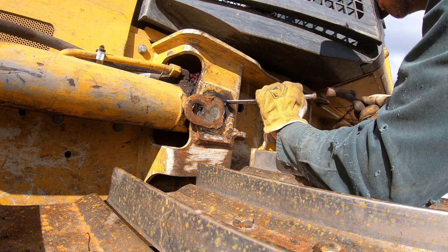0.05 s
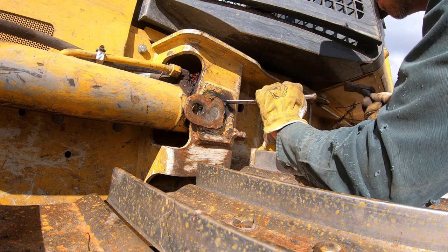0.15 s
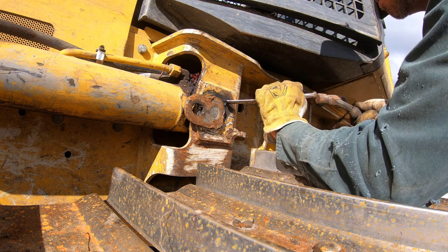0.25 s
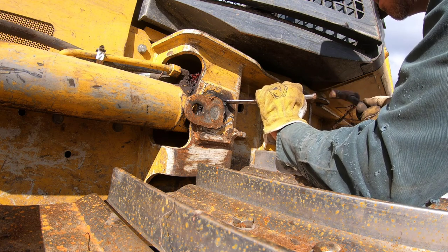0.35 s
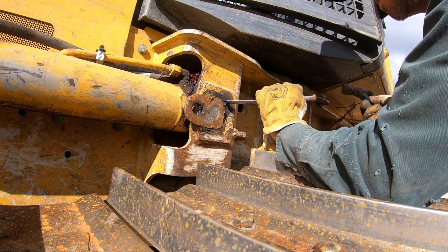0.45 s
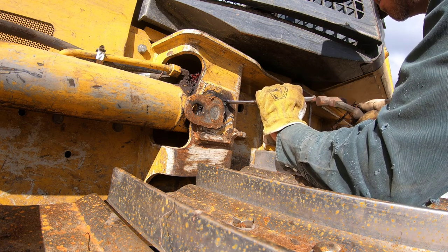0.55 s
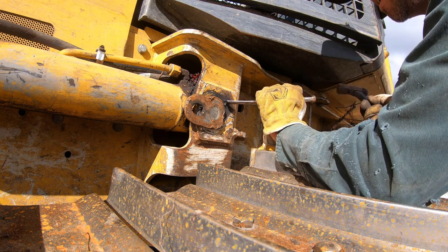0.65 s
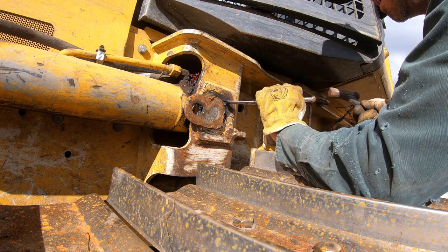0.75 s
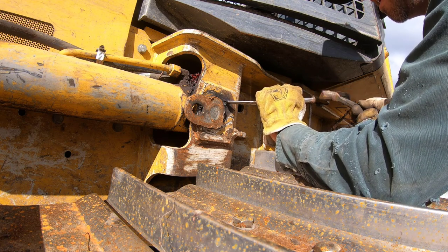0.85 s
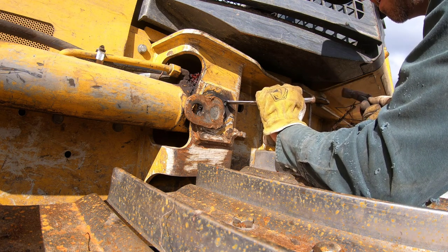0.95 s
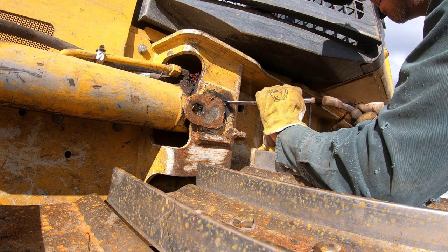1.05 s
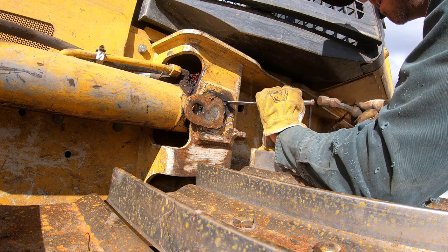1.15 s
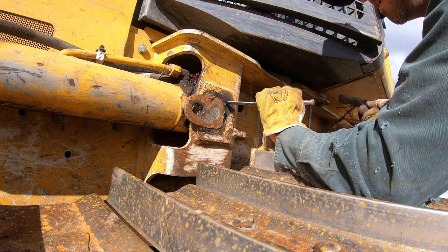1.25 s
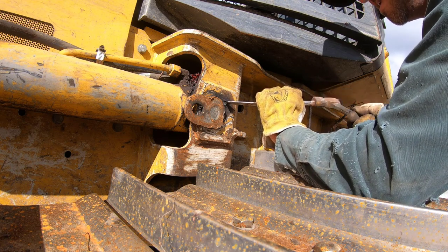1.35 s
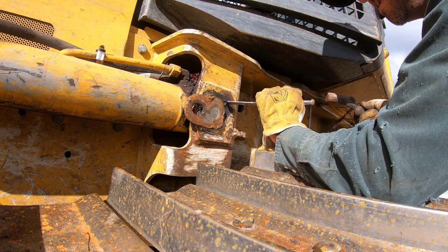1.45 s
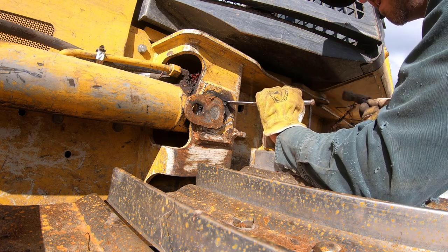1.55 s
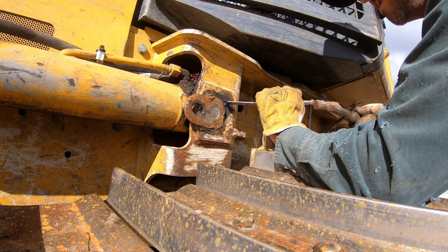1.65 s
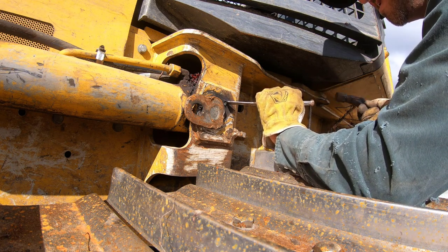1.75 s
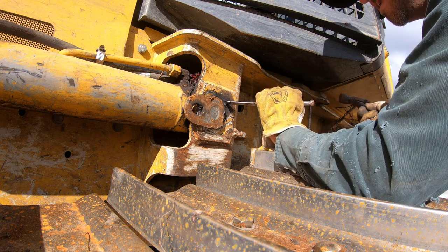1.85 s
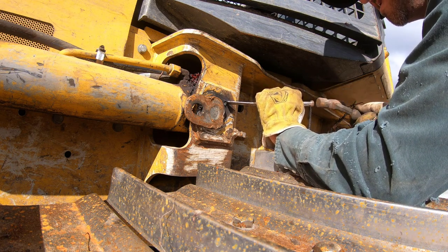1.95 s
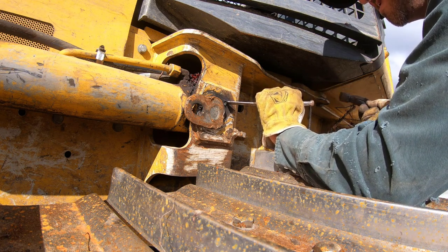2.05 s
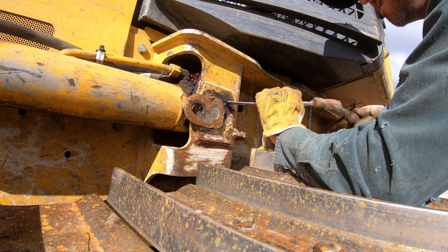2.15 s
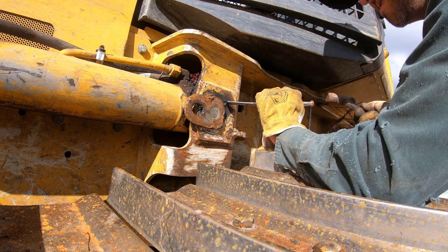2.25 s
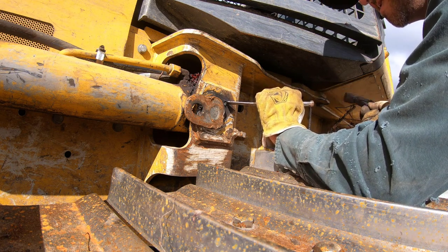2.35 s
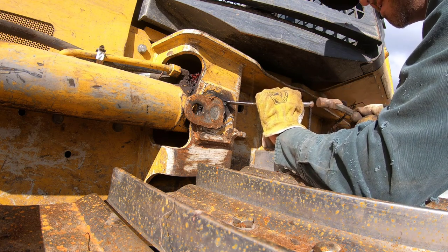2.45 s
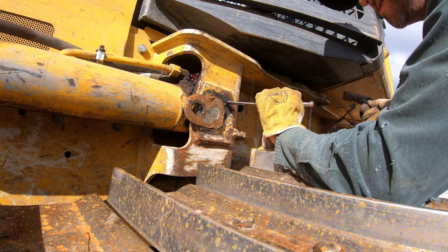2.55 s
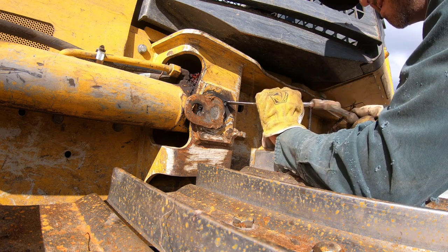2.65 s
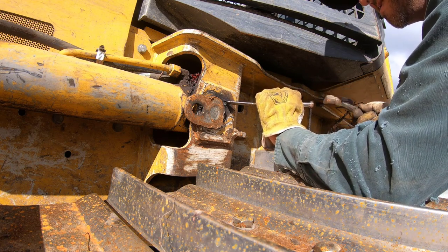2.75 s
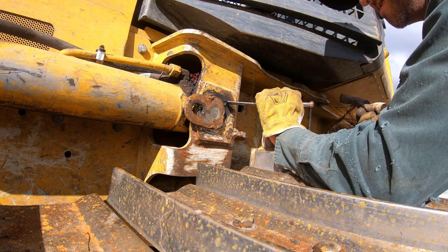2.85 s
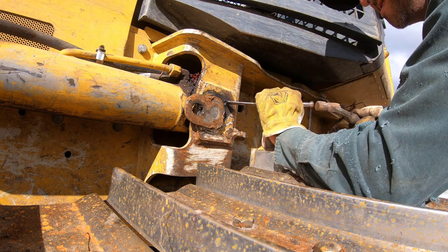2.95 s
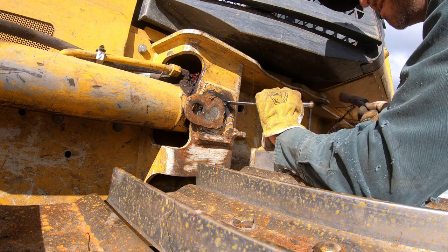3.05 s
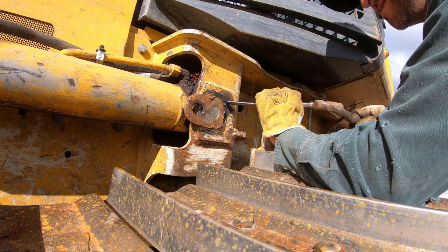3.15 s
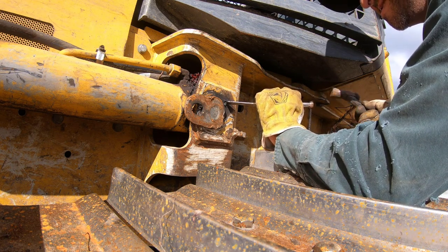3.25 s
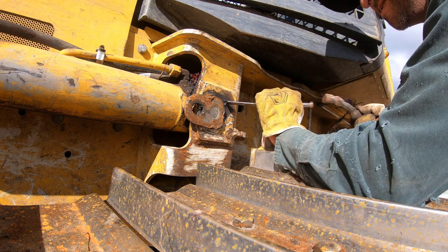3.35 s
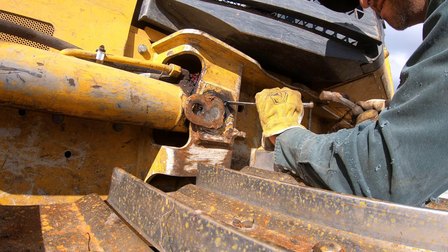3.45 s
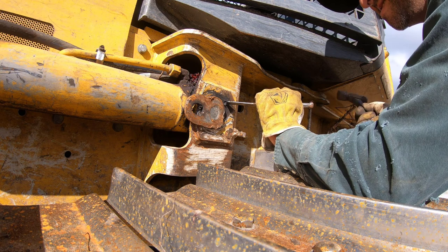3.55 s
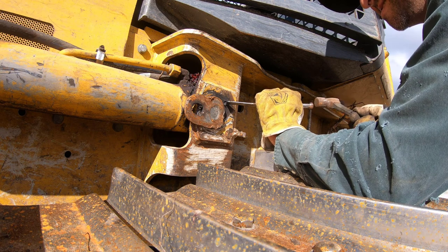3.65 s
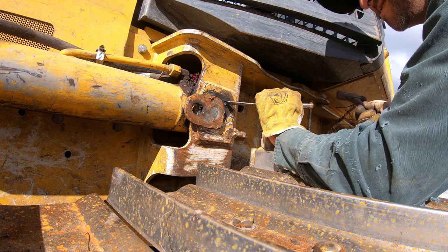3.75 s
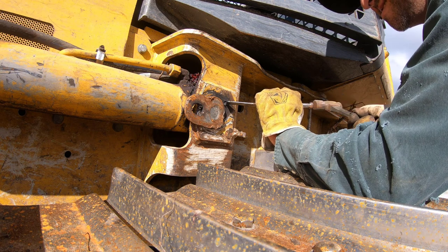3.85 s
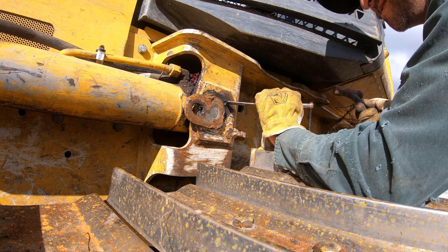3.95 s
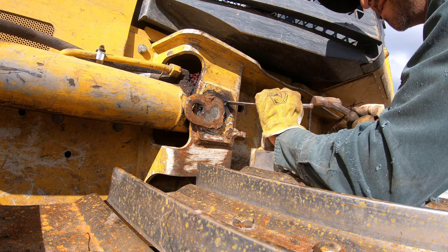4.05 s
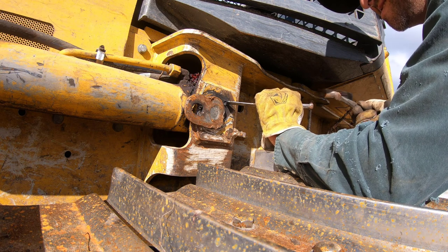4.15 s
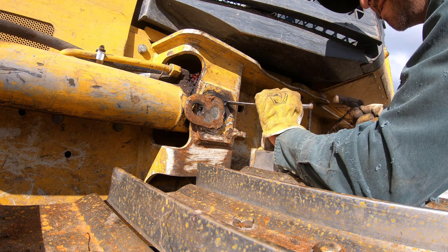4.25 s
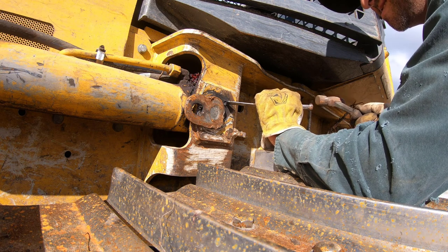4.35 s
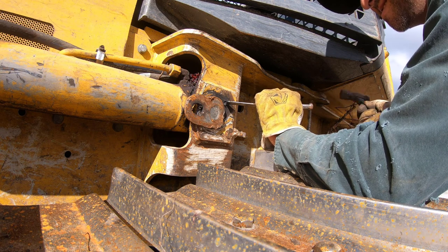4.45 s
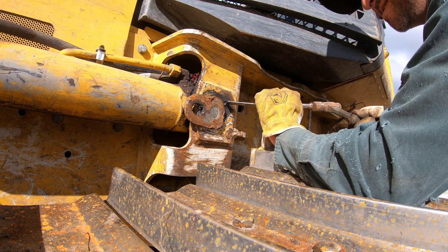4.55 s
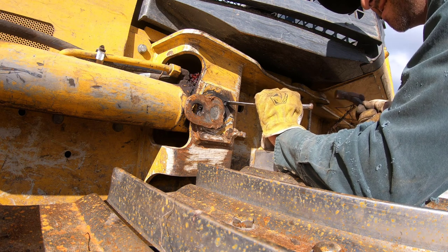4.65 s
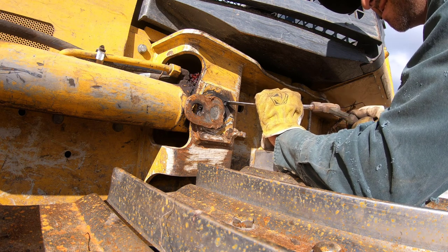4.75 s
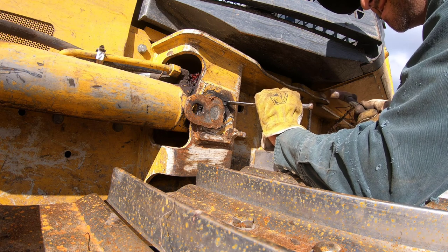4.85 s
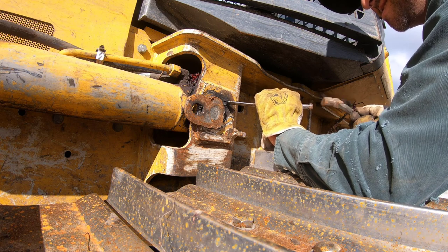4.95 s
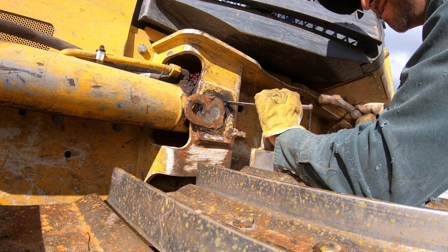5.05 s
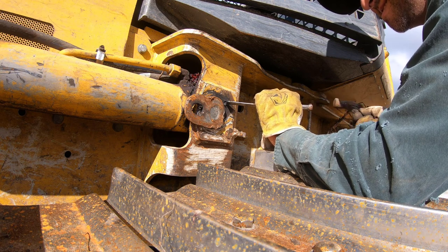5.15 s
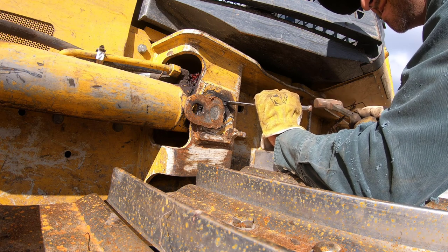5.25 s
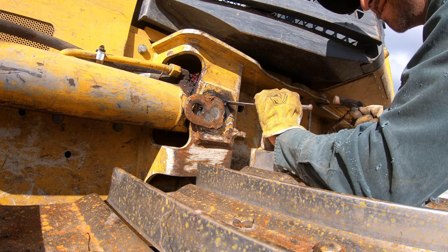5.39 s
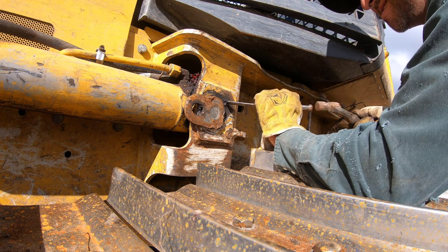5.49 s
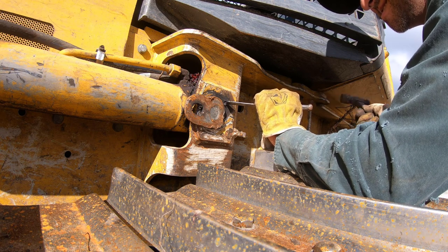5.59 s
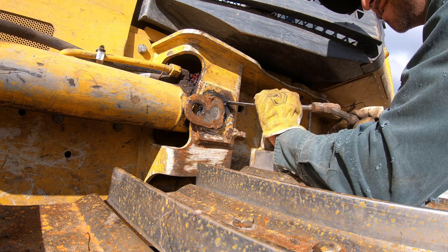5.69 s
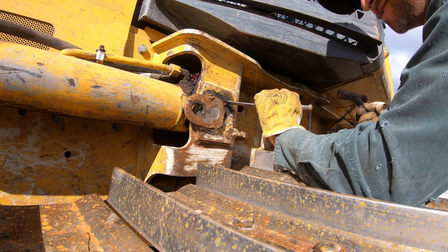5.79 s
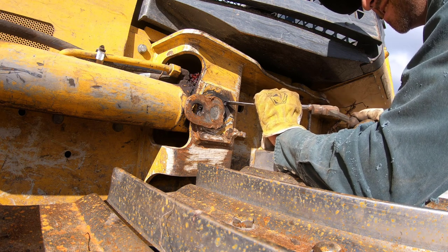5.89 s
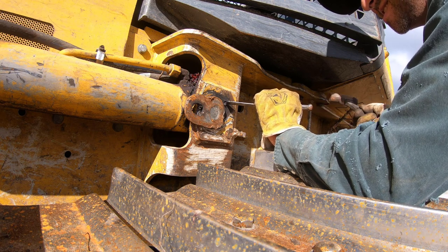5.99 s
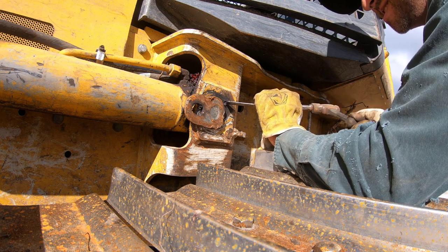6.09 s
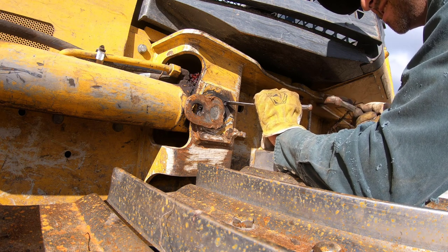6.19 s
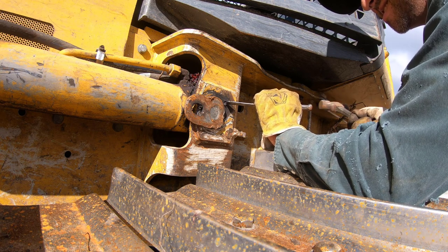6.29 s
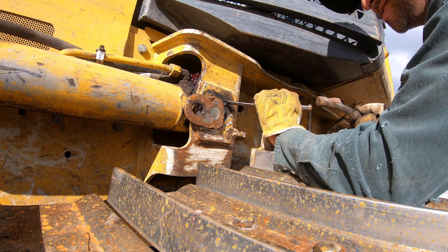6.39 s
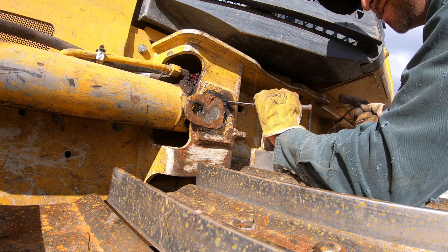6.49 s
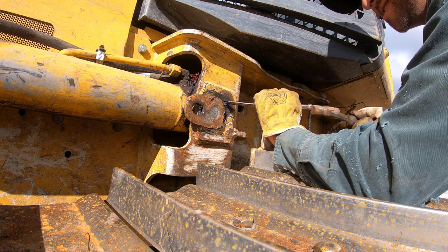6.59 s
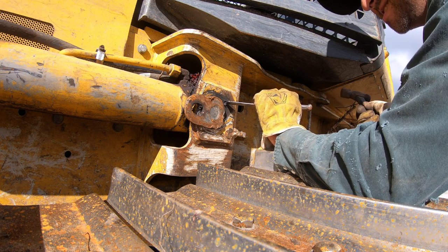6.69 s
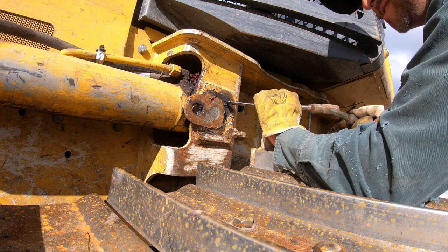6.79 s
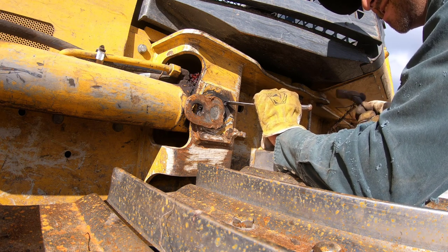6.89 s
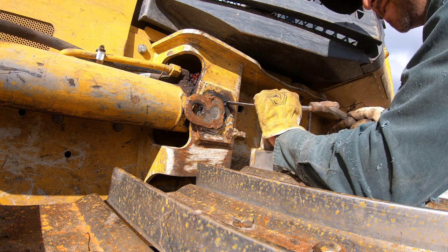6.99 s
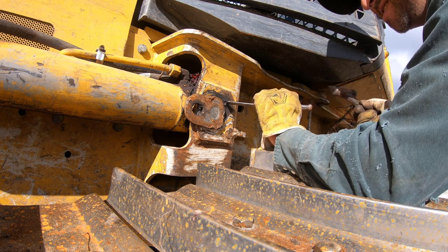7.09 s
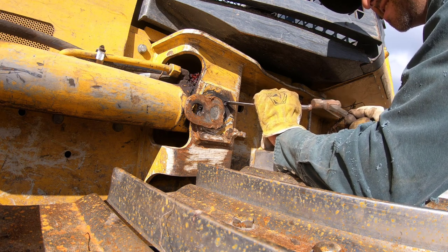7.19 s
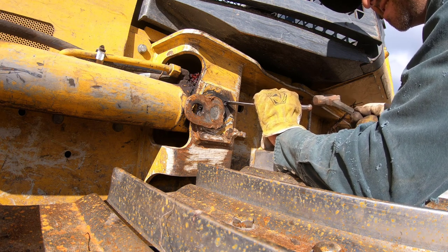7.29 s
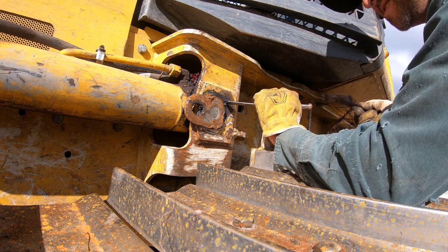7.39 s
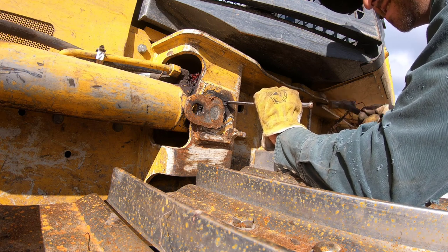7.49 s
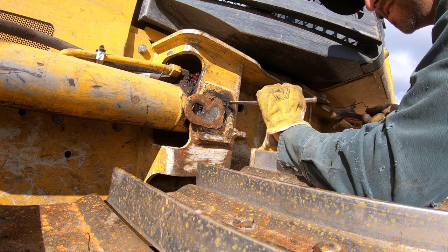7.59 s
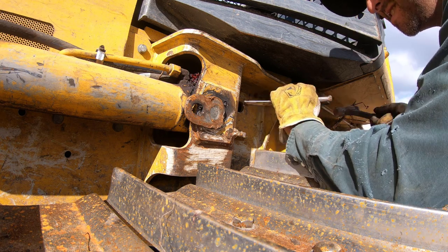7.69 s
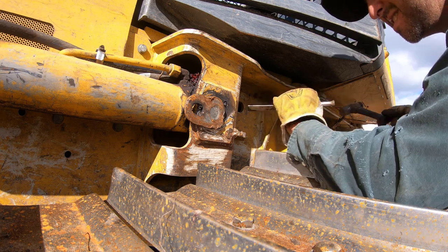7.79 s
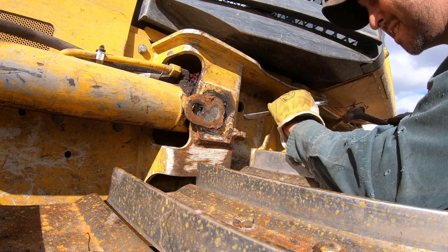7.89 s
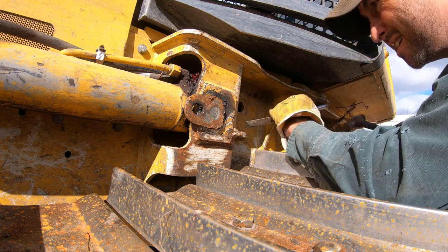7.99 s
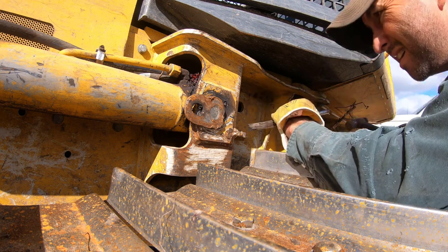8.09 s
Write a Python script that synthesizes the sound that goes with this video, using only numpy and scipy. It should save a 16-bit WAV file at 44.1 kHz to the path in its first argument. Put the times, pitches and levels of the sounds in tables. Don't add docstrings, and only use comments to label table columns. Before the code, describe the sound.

Close stereo pickup outdoors: a hammer strikes a steel chisel against a bolt on heavy machinery. Near-identical hard clanks come evenly, slightly under four per second, then a little faster, each with a sharp crack, short metallic ring and humming plates over a low sway. After the last blow around 7.3 seconds the ring dies, leaving faint hiss, glove rustle and tiny ticks.

```python
import sys
import numpy as np
from scipy import signal
from scipy.fft import rfft, irfft
from scipy.io import wavfile

SR = 44100
rng = np.random.default_rng(int(sys.argv[2]) if len(sys.argv) > 2 else 0)


def decibels_to_gain(level_db):
    exponent = np.asarray(level_db, float) / 20
    return 10 ** exponent


def transcribe(signal):
    frames = np.atleast_2d(signal).T
    limited = np.clip(frames, -1, 1)
    pcm = np.round(limited * 32767).astype(np.int16)
    wavfile.write(sys.argv[1], SR, pcm)


N = 358533
RESPONSE_N = SR

# t/s, sharpness/dB, sway/dB
FINDING_BLOWS = [(0.0519, -18, -30.5), (0.3359, -18.5, -33.5), (0.6163, -17, -36), (0.8823, -18.5, -30.5),
                 (1.1759, -18.5, -37), (1.457, -17.5, -32), (1.7332, -18, -32.5), (2.0003, -18, -30),
                 (2.2609, -19, -30.5), (2.5162, -18.5, -30.5), (2.7621, -20, -25.5)]
# t/s, sharpness/dB, sway/dB
STEADY_BLOWS = [(3.0136, -19.5, -24.5), (3.2426, -19.5, -28), (3.477, -19, -27), (3.7086, -19, -25),
                (3.9318, -19.5, -23.5), (4.1652, -19.5, -22.5), (4.3968, -18.5, -25.5), (4.6284, -18, -28),
                (4.8551, -19, -26.5), (5.079, -18.5, -25), (5.3013, -19, -26), (5.53, -18.5, -23.5),
                (5.7494, -19, -22.4), (5.964, -17.5, -24), (6.1885, -18.5, -29), (6.413, -18.5, -27.5),
                (6.6445, -18.5, -24.5), (6.8663, -18.5, -23.5), (7.086, -18, -19), (7.3036, -19, -20.5)]
BLOW_S, SHARP_DB, SWAY_DB = np.transpose(FINDING_BLOWS + STEADY_BLOWS)
LAST_BLOW_S = BLOW_S[-1]
CONTACT_S = 0.0007
BLOW_DB = -13
LANDING_DB, LANDING_SCATTER_DB = -8, 2

# f/Hz, level/dB, t60/s, left minus right/dB
PRESSED_MODES = [(1066.5, 1, 0.035, 3), (1636, -9, 0.08, 7), (3720, -11.5, 0.1, -2),
                 (4870, -20.5, 0.14, -3), (5000, -21, 0.02, 6), (5610, -19.5, 0.053, -4),
                 (6700, -20.5, 0.024, -3.5), (7985, -19, 0.048, -3.5)]
# f/Hz, density/dB per Hz
CRACK_SPECTRUM = [(150, -34), (600, -27), (1500, -16.5), (3000, -19.5), (6000, -7.5), (8500, -22),
                  (11000, -30.5), (14000, -36.5), (16500, -46)]
# f/Hz, level/dB, t60/s, left minus right/dB
CLANK_MODES = [(781, -11, 0.063, 1), (982, -8, 0.042, -7), (970, -13.5, 0.056, -12), (1054, -8, 0.072, 2),
               (1170, -18, 0.017, 5.5), (1580, -21.5, 0.024, -2), (1848, -5.5, 0.024, 0.5),
               (2335, -9.5, 0.025, -2), (2727, -9, 0.037, 4), (2530, -18, 0.09, 2.5), (3040, -23, 0.023, 4),
               (3680, -16.5, 0.092, 3), (4033, -17.5, .04, 0.5), (4200, -19.5, 0.076, 4),
               (4800, -20, 0.11, 8), (5150, -24.5, 0.059, 6), (5000, -15, 0.017, 4),
               (6340, -20.5, 0.082, 2), (6380, -19.5, 0.034, 4), (6600, -22.5, 0.01, 3),
               (6800, -21, 0.055, 1.5), (10170, -28.5, .04, -4.5)]
PLATE_HZ = [127, 176, 192, 233, 289, 318, 377, 428, 465, 213, 550, 592, 345, 728, 749, 842, 875, 922, 969,
            995, 1020, 1077, 1167, 1397, 1725, 1814, 1572, 810, 767]
# level/dB, t60/s, left minus right/dB
PLATE_RINGS = [(-10.5, 0.93, -1), (-8.5, 0.5, -3), (-0.5, 0.63, -1), (-5.5, 0.4, 5), (-9, 0.75, 1),
               (-2.5, .8, 1.5), (-11, 0.6, 11), (-11, .9, -0.5), (-9.5, 0.6, -1.5), (-5, 0.84, 10.5),
               (-15.5, 0.56, 0.5), (-9.5, 0.9, -3.5), (-6, 0.2, -0.5), (-9.5, .5, 1.5), (-4, 0.38, 0.5),
               (-10.5, 0.92, 14), (-3.5, .6, 16.5), (-4, 0.55, 2.5), (0.5, 0.51, 1), (5.5, 0.4, 2.5),
               (-7.5, 0.46, -6.5), (-5.5, 0.55, 4.5), (-5.5, .22, -2), (-13.5, 0.42, -0.5), (-2.5, 0.33, 3),
               (-15.5, 0.95, 5.5), (-4, 0.077, 2), (-13, 0.55, -0.5), (-12.5, 0.5, 1.5)]
# f/Hz, density/dB per Hz
DENSE_SPECTRUM = [(60, -33.5), (100, -0.5), (230, -7.5), (330, -4.5), (410, -15), (520, -4), (820, -8.5),
                  (980, 3), (1250, -12.5), (1650, -7.5), (2800, -8.5), (4800, -7), (10000, -21.5),
                  (11400, -59.5)]
# f/Hz, t60/s
DENSE_T60 = [(100, 0.83), (350, 0.8), (1000, 0.45), (2400, 0.26), (5000, 0.14), (10000, 0.14), (13000, .06)]
# f/Hz, level/dB, t60/s, left minus right/dB
THUD_MODES = [(251.9, 3.5, 0.073, 1), (227.7, -3.5, 0.091, -3), (174.8, -11, 0.21, 1),
              (620, -8, 0.084, 4.5), (1539, -12.5, 0.15, -2), (1684, -4.5, .08, 3)]
# f/Hz, level/dB, t60/s, left minus right/dB
COVER_MODES = [(3040, 0, 0.17, -1), (3187, -4, .13, 6), (3221, -4, .13, 3), (2527, -3, 0.12, 7),
               (3372, -6, .12, 1), (2702, -5, .12, 3)]
# f/Hz, density/dB per Hz
YARD_SPECTRUM = [(300, -29.5), (1200, -4), (2000, -4), (4500, -3), (6500, -15), (10000, -40)]

# f/Hz, density/dB per Hz
ROCK_SPECTRUM = [(15, -10), (30, -0.5), (45, -6.5), (90, -5.5), (130, -39), (300, -96)]
# f/Hz, density/dB per Hz
HISS_SPECTRUM = [(1500, -24), (4000, -8.5), (6000, -5.5), (8000, -2.5), (9700, -3.5), (10500, -30.5),
                 (16000, -63)]
# f/Hz, density/dB per Hz
RUMBLE_SPECTRUM = [(20, -6.5), (40, -7.5), (100, -0.5), (280, 1.5), (400, -13), (550, -8.5), (900, -16),
                   (2000, -29), (4000, -80.5)]
# f/Hz, density/dB per Hz
FORERUN_SPECTRUM = [(300, -2.5), (1000, 13), (2500, -15.5), (3700, -8), (6200, -0.5), (8500, -8.5),
                    (11000, -20), (14000, -64)]
FORERUN_DB, FORERUN_DB_PER_S = -40.5, -0.7

# f/Hz, level/dB, t60/s, left minus right/dB
SWAY_MODES = [
    (65.33, -5, 0.99, -8.5),
    (54, -6.5, 0.27, -12.5),
]
SWAY_DB_PER_S, FIRM_SWAY_DB_PER_S_PER_DB = -10.5, 2.1

QUIET_S = 6.9
RUMBLE_DB, RUMBLE_DB_PER_S = -49.5, -37
# f/Hz, density/dB per Hz
SHAKE_SPECTRUM = [(35, -35), (55, -7.5), (64, -4.5), (75, -11.5), (110, -38.5), (300, -91)]
SHAKE_DB, SHAKE_DB_PER_S = -40, -170
HISS_DB, HISS_RISE_DB_PER_S, HISS_FULL_S = -76.5, 169.5, 7.72
# t/s, level/dB, f/Hz, t60/s
TICKS = [
    (7.65, -68, 2200, .04),
    (7.806, -63, 1310, .07),
    (7.806, -63, 1670, .06),
    (7.86, -80, 4600, .2),
    (7.55, -69, 548, 3),
]
# t/s, length/s, level/dB
STROKES = [
    (7.594, 0.11, -71.5),
    (7.71, .12, -70.5),
    (7.86, 0.213, -77),
    (8.06, .07, -75),
]
STROKE_ATTACK_S, STROKE_RELEASE_S = 0.041, 0.03
# f/Hz, density/dB per Hz
RUSTLE_SPECTRUM = [(600, -15), (1200, 1.5), (2800, 0.5), (4600, -2), (6000, -15), (9000, -45)]
# t/s, level/dB
NUDGES = [
    (7.69, -52),
    (7.79, -56),
    (7.845, -53),
    (8.055, -61),
    (8.095, -63),
]
NUDGE_T60_S = 0.14

# f/Hz, correlation
LIKENESS = [(250, 0.84), (500, 0.51), (900, 0.64), (2500, 0.57), (6000, 0.72), (10000, 0.13)]
IN_STEP_HZ = 500


def unit(x):
    return x / np.sqrt(np.mean(x ** 2) + 1e-20)


def along(points, hz):
    f, v = np.transpose(points)
    return np.interp(np.log(hz + 1), np.log(f + 1), v)


def above(x, hz):
    return signal.sosfilt(signal.butter(4, hz, "high", fs=SR, output="sos"), x)


def noise(spectrum, size):
    hz = np.fft.rfftfreq(size, 1 / SR)
    turn = np.arccos(np.clip(along(LIKENESS, hz), -1, 1)) / 2
    bins = rfft(rng.standard_normal((2, size))) * decibels_to_gain(along(spectrum, hz))
    mid, side = irfft(bins * [np.cos(turn), np.sin(turn)], size)
    return unit(np.array([mid + side, mid - side]))


def ring(modes, rise_s, lag_s, phase_sd):
    t = np.maximum(np.arange(RESPONSE_N) / SR - np.array([[0], [lag_s]]), 0)
    out = np.zeros((2, RESPONSE_N))
    for hz, db, t60_s, pan_db in modes:
        phase = phase_sd * rng.normal(0, 1, (2, 1))
        phase += (phase.mean() - phase) * np.clip(1 - hz / IN_STEP_HZ, 0, 1)
        level_db = db + pan_db * np.array([[0.5], [-0.5]]) - 60 * t / t60_s
        out += decibels_to_gain(level_db) * np.sin(2 * np.pi * hz * t + phase)
    return out * (1 - np.exp(-t / rise_s))


def starts():
    return np.round((BLOW_S + CONTACT_S) * SR).astype(int)


def train(gains):
    out = np.zeros(N)
    out[starts()] = gains
    return out[None]


def pressed(hold_s, fall_s):
    t = np.arange(RESPONSE_N) / SR
    tones = ring(PRESSED_MODES, rise_s=0.00007, lag_s=0.00006, phase_sd=0.59)
    return tones * np.exp(-np.maximum(t - hold_s, 0) / fall_s)


def crack():
    t = np.arange(RESPONSE_N // 10) / SR
    return noise(CRACK_SPECTRUM, size=len(t)) * decibels_to_gain(-60 * t / 0.025) * (1 - np.exp(-t / 0.00017))


def wash(spectrum, slower=1):
    hz, t, z = signal.stft(noise(spectrum, size=RESPONSE_N), SR, nperseg=256)
    z = z * decibels_to_gain(-60 * t / slower / along(DENSE_T60, hz)[:, None])
    tail = signal.istft(z, SR, nperseg=256)[1][:, :RESPONSE_N]
    return tail * (1 - np.exp(-np.arange(RESPONSE_N) / SR / 0.0017))


def struck_steel():
    plates = np.column_stack([PLATE_HZ, PLATE_RINGS])
    steel = decibels_to_gain(4.5) * pressed(hold_s=0.0044, fall_s=0.00066)
    steel += decibels_to_gain(3) * ring(CLANK_MODES, rise_s=0.00075, lag_s=0.00006, phase_sd=0.054)
    steel += decibels_to_gain(-22) * ring(plates, rise_s=0.001, lag_s=0.0001, phase_sd=0.62)
    steel += decibels_to_gain(-13) * wash(DENSE_SPECTRUM)
    steel += decibels_to_gain(-2.5) * ring(THUD_MODES, rise_s=0.003, lag_s=0.0001, phase_sd=0.9)
    steel += decibels_to_gain(-13) * ring(COVER_MODES, rise_s=0.04, lag_s=0.0001, phase_sd=0.71)
    steel[:, :RESPONSE_N // 10] += decibels_to_gain(-2.5) * crack()
    return above(steel, hz=122)


def landing():
    half = RESPONSE_N // 2
    own = decibels_to_gain(-22) * wash(DENSE_SPECTRUM)[:, :half]
    own += decibels_to_gain(-43.5) * wash(YARD_SPECTRUM, slower=3.0)[:, :half]
    own[:, :RESPONSE_N // 10] += decibels_to_gain(rng.normal(LANDING_DB, LANDING_SCATTER_DB)) * crack()
    return decibels_to_gain(BLOW_DB) * above(own, hz=125)


def hammer():
    steel = struck_steel()
    high = above(steel, hz=2346)
    out = signal.fftconvolve(train(decibels_to_gain(BLOW_DB)), steel - high, axes=1)[:, :N]
    out += signal.fftconvolve(train(decibels_to_gain(SHARP_DB + 7.5)), high, axes=1)[:, :N]
    first = starts()[0]
    out[:, :first] += decibels_to_gain(-11) * steel[:, RESPONSE_N // 4:][:, :first]
    for at in starts():
        out[:, at:at + RESPONSE_N // 2] += landing()
    return out


def rocking():
    on = np.clip((LAST_BLOW_S + 0.5 - np.arange(N) / SR) / 0.3, 0, 1)
    return decibels_to_gain(-53.5) * on * noise(ROCK_SPECTRUM, size=N)[0] * [[-0.4], [1.4]]


def air():
    return decibels_to_gain(-84.5) * noise(HISS_SPECTRUM, size=N) + decibels_to_gain(-65.5) * noise(RUMBLE_SPECTRUM, size=N)


def forerun():
    marks = np.zeros(N)
    # lead/s, level/dB, scatter/dB
    for lead_s, db, scatter_db in [(0.0118, 7, 2), (0.0228, -5.5, 4.1), (0.032, -23.5, 5.5), (0.043, -26, 4)]:
        chance_db = scatter_db * rng.normal(0, 1, len(BLOW_S))
        gains = decibels_to_gain(FORERUN_DB + FORERUN_DB_PER_S * BLOW_S + db + chance_db)
        marks += np.roll(train(gains)[0], -round(lead_s * SR))
    bursts = signal.fftconvolve(marks, np.hanning(RESPONSE_N // 110) ** 0.4)[:N]
    return np.abs(bursts) * noise(FORERUN_SPECTRUM, size=N)


def step():
    swing = ring(SWAY_MODES[:1], rise_s=0.021, lag_s=0.0056, phase_sd=0)
    swing -= ring(SWAY_MODES[1:], rise_s=0.018, lag_s=0.0055, phase_sd=0)
    t = np.arange(RESPONSE_N) / SR
    out = np.zeros((2, N + RESPONSE_N))
    for at, stop, db in zip(starts(), np.append(starts()[1:], N), SWAY_DB):
        jolt = np.exp(-np.maximum(t - (stop - at) / SR, 0) / 0.012)
        loss_db_per_s = SWAY_DB_PER_S + FIRM_SWAY_DB_PER_S_PER_DB * (db - SWAY_DB.mean())
        out[:, at:at + RESPONSE_N] += decibels_to_gain(db + 4 + loss_db_per_s * (t - 0.1551)) * swing * jolt
    return out[:, :N]


def leaning(after_s, fall_s):
    return np.exp(-np.maximum(np.arange(N) / SR - LAST_BLOW_S - after_s, 0) / fall_s)


def settling(since):
    return decibels_to_gain(RUMBLE_DB + RUMBLE_DB_PER_S * since) * noise(RUMBLE_SPECTRUM, size=N)


def jogged_step(now, since):
    jogs = np.zeros(N)
    for s, db in NUDGES:
        jogs += decibels_to_gain(db - 60 * np.maximum(now - s, 0) / NUDGE_T60_S) * np.clip((now - s) / 0.014, 0, 1)
    shake = decibels_to_gain(SHAKE_DB + SHAKE_DB_PER_S * since) * noise(SHAKE_SPECTRUM, size=N)[0]
    return (shake + jogs * np.sin(2 * np.pi * SWAY_MODES[0][0] * now)) * [[-0.4], [1.5]]


def rising_hiss(now):
    below_db = HISS_RISE_DB_PER_S * np.clip(HISS_FULL_S - now, 0, 1)
    return decibels_to_gain(HISS_DB - below_db) * noise(HISS_SPECTRUM, size=N)


def ticks(now):
    out = np.zeros(N)
    for s, db, hz, t60_s in TICKS:
        t = np.maximum(now - s, 0)
        out += decibels_to_gain(db - 60 * t / t60_s) * np.sin(2 * np.pi * hz * t) * (1 - np.exp(-t / 0.0029))
    return out


def glove(now):
    rub = np.zeros(N)
    for s, length_s, db in STROKES:
        attack = np.clip((now - s) / STROKE_ATTACK_S, 0, 1) ** 2
        rub += decibels_to_gain(db) * attack * np.exp(-np.maximum(now - s - length_s, 0) / STROKE_RELEASE_S)
    return rub * noise(RUSTLE_SPECTRUM, size=N)


def aftermath():
    now = np.arange(N) / SR
    since = np.maximum(now - QUIET_S, 0)
    out = settling(since) + jogged_step(now, since) + rising_hiss(now) + glove(now)
    return out * np.clip(since / 0.12, 0, 1) + ticks(now)


def scene():
    return (hammer() + step()) * leaning(after_s=0.23, fall_s=0.33) + rocking() + aftermath() + air()


def ducking(delay_s, fall_s, depth_db, release_s):
    t = np.maximum(np.arange(RESPONSE_N) / SR - delay_s, 0)
    dip = (1 - np.exp(-t / fall_s)) * np.exp(-t / release_s)
    return decibels_to_gain(-depth_db * signal.fftconvolve(train(1)[0], dip)[:N])


def band_limit(x):
    return signal.sosfilt(signal.butter(12, 16800, fs=SR, output="sos"), x)


def record(dry):
    x = dry * ducking(delay_s=0.0036, fall_s=0.003, depth_db=3.5, release_s=0.12)
    x = x / (1 + np.abs(x / 0.76) ** 4) ** (1 / 4)
    x = above(x, hz=18)
    x = signal.sosfilt(signal.butter(8, 16300, fs=SR, output="sos"), x)
    return band_limit(x + forerun())


dry = scene()
out = record(dry)
transcribe(out)
```